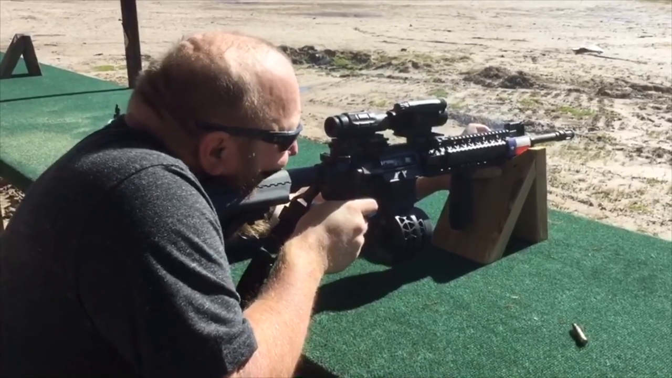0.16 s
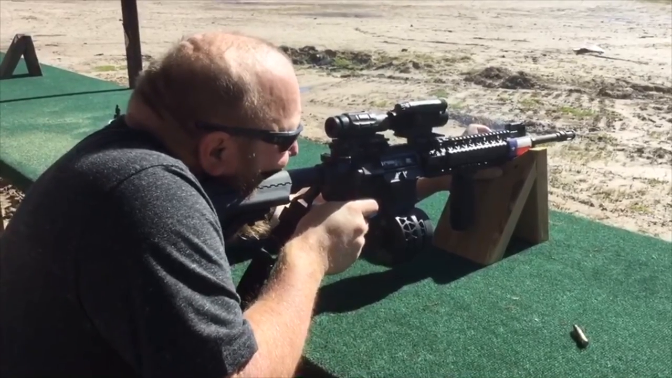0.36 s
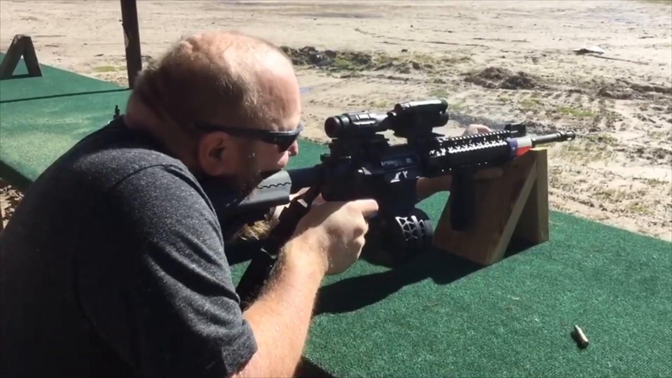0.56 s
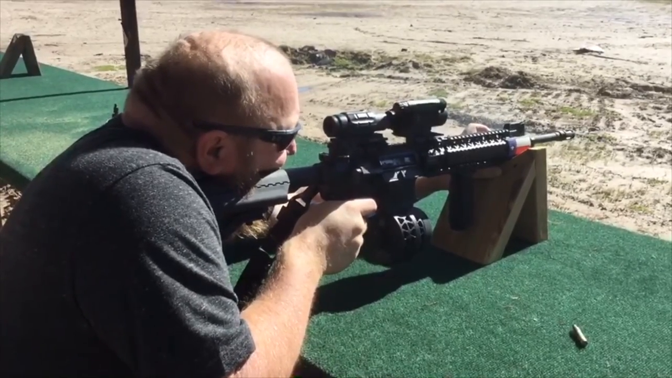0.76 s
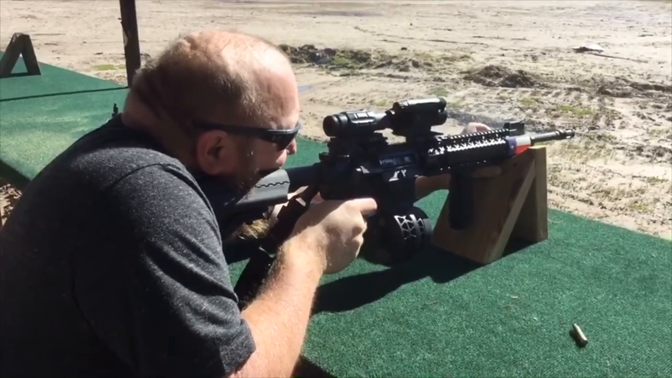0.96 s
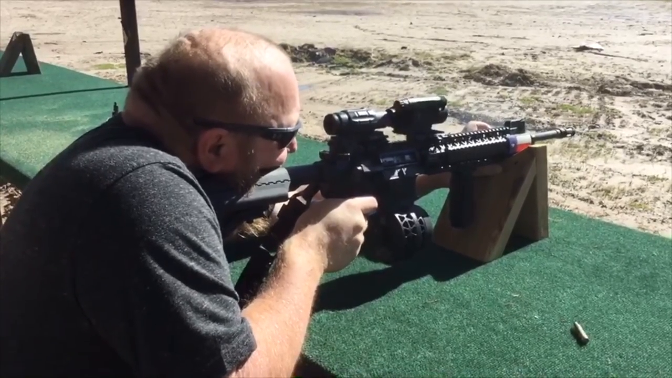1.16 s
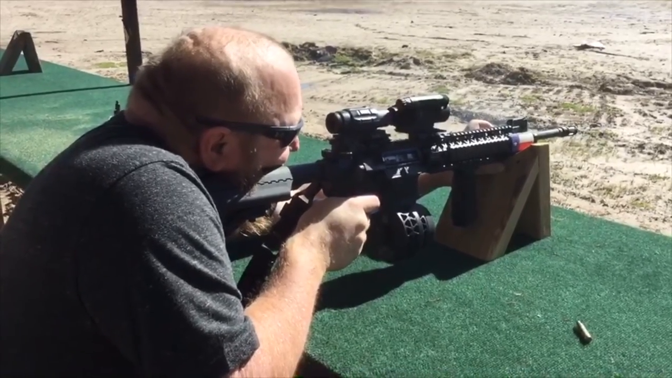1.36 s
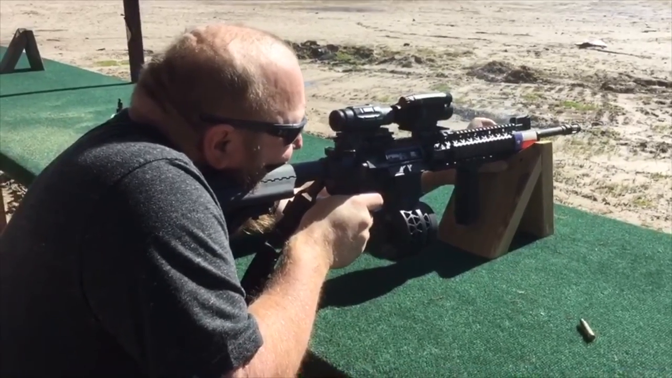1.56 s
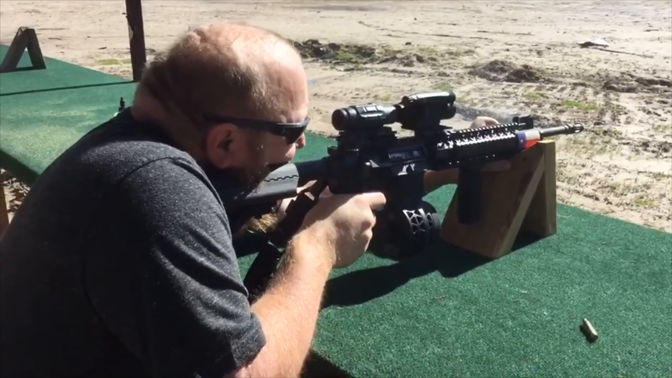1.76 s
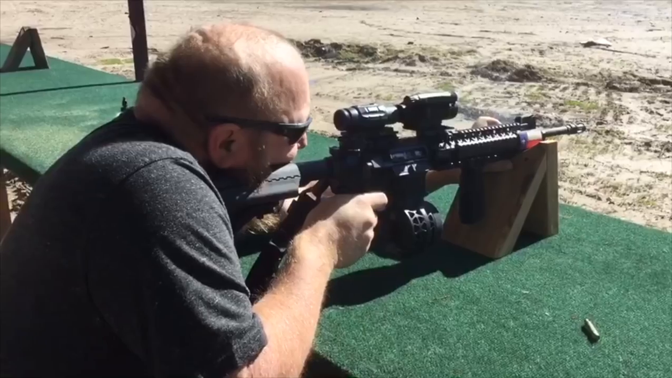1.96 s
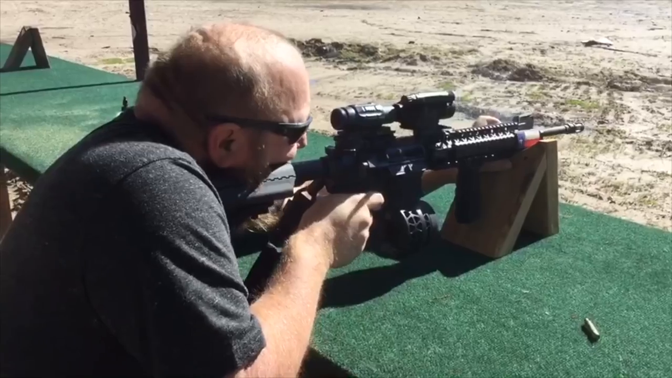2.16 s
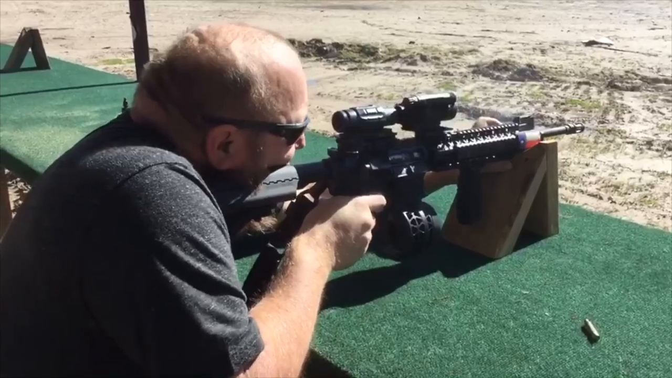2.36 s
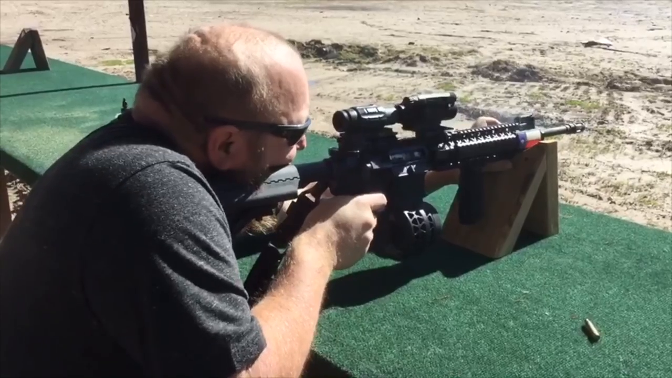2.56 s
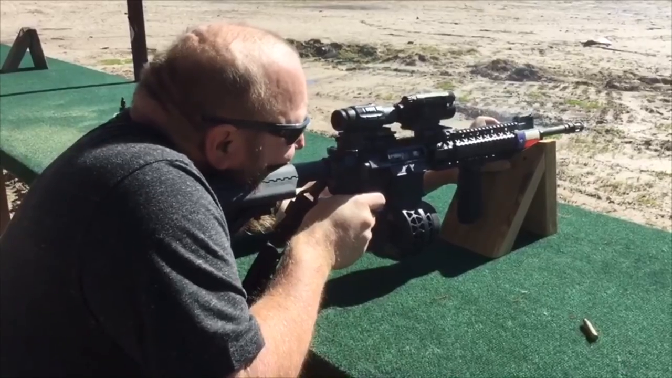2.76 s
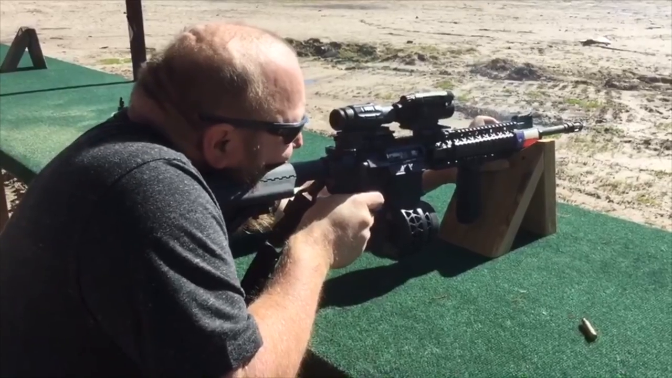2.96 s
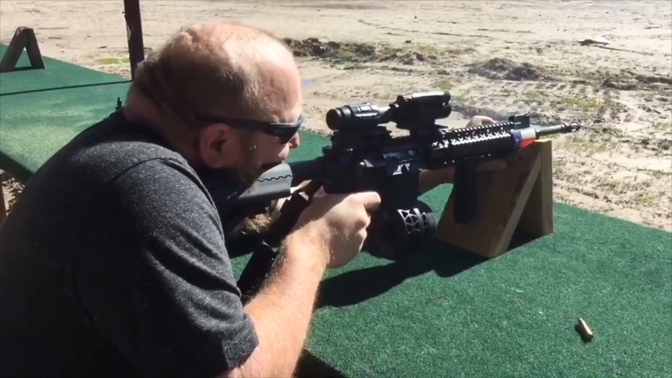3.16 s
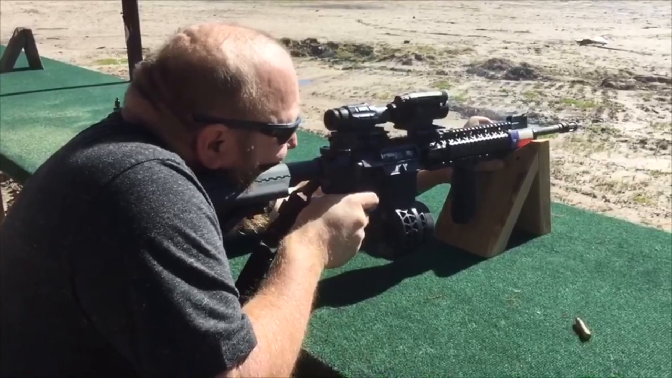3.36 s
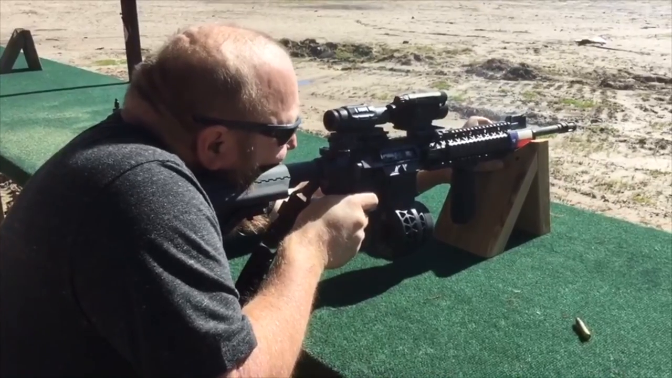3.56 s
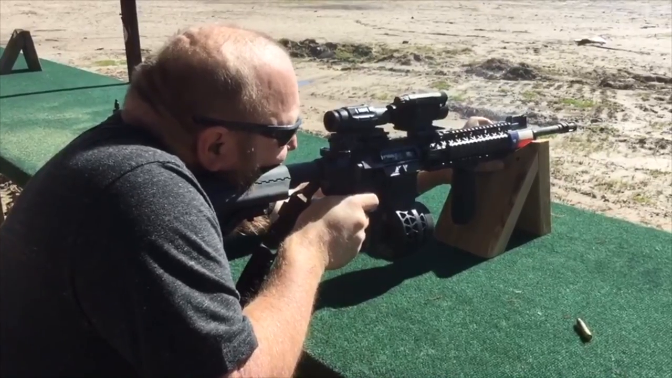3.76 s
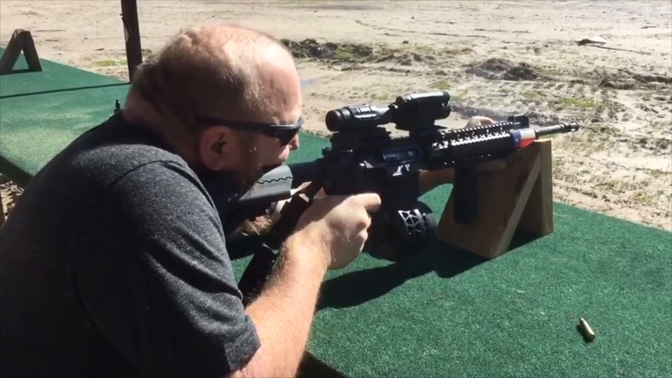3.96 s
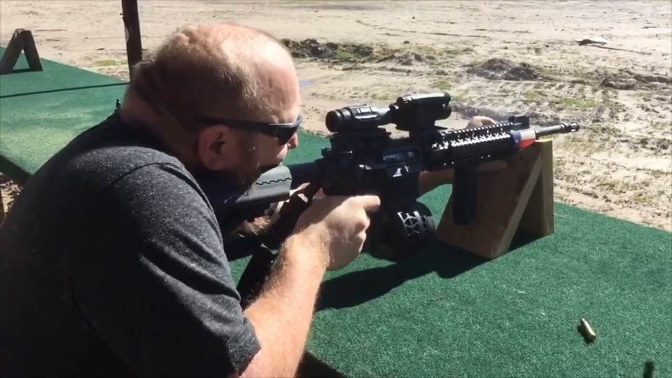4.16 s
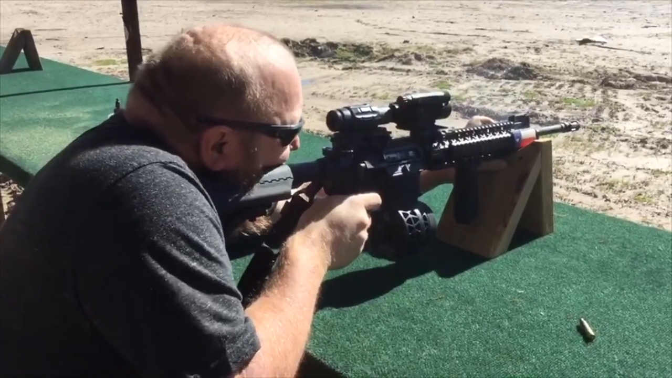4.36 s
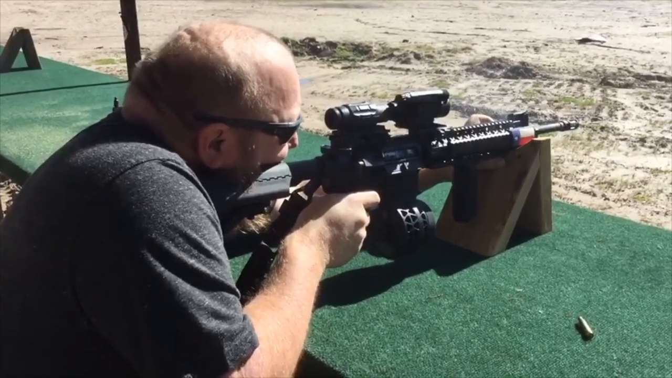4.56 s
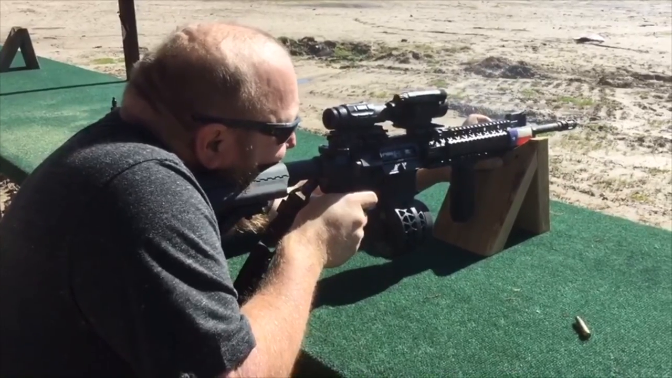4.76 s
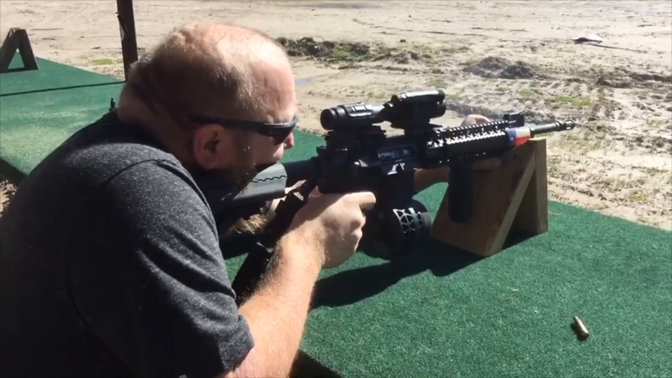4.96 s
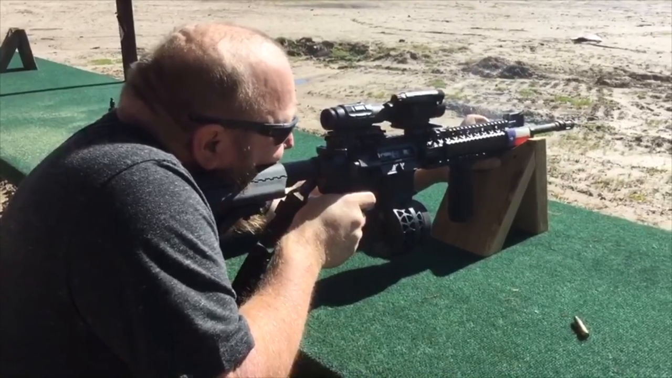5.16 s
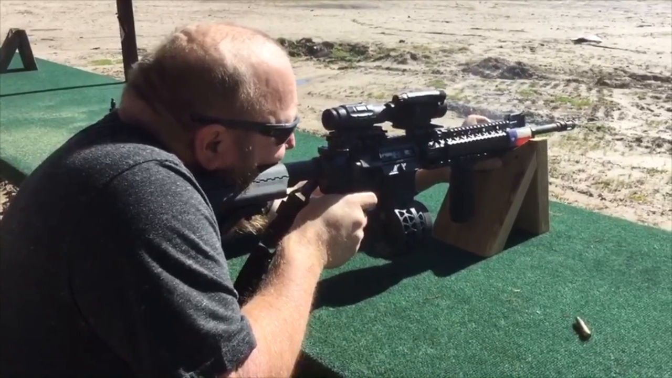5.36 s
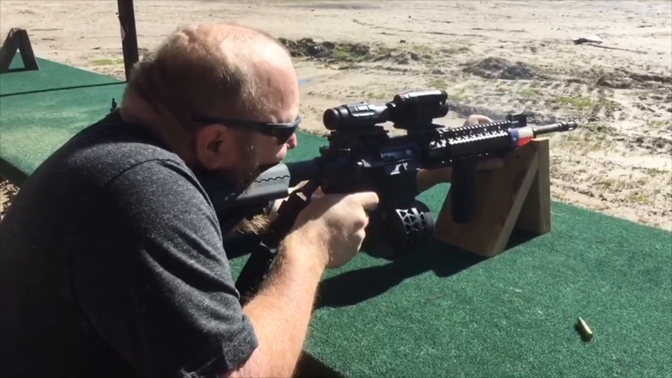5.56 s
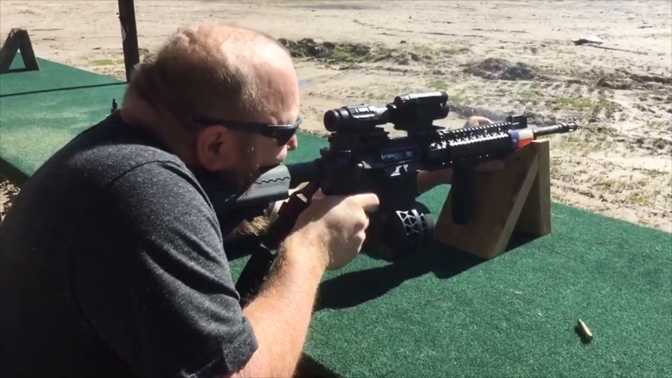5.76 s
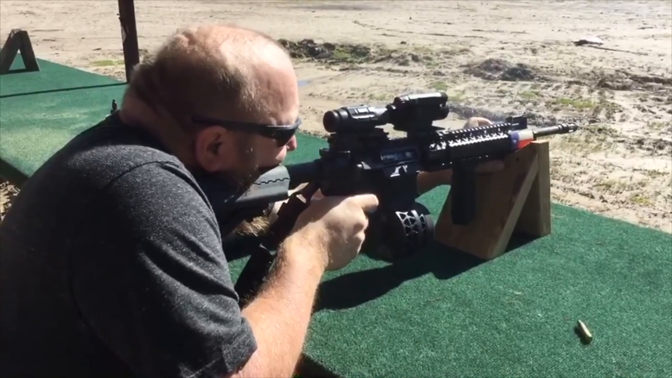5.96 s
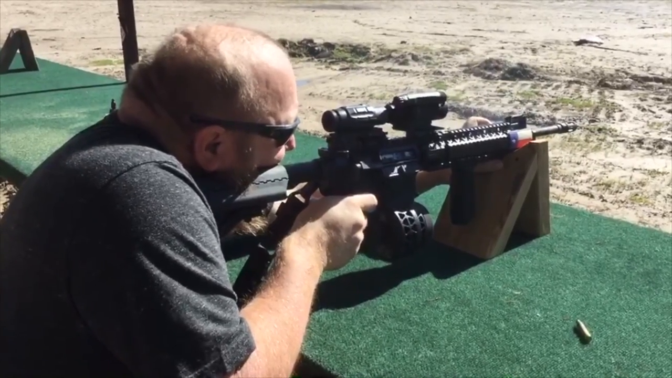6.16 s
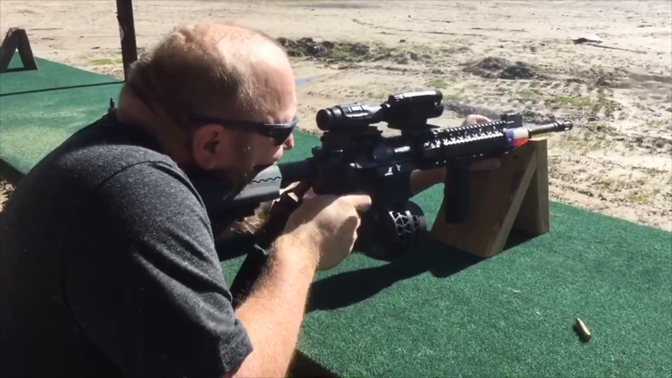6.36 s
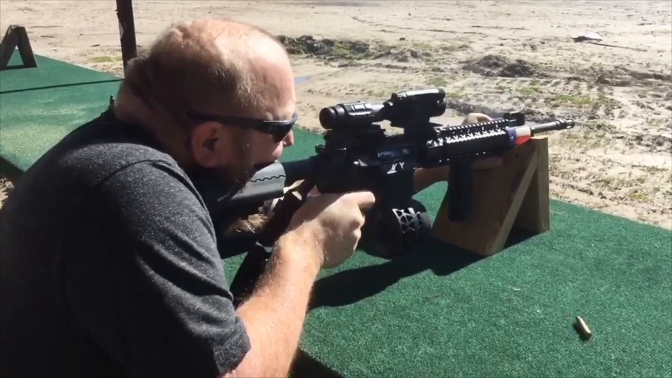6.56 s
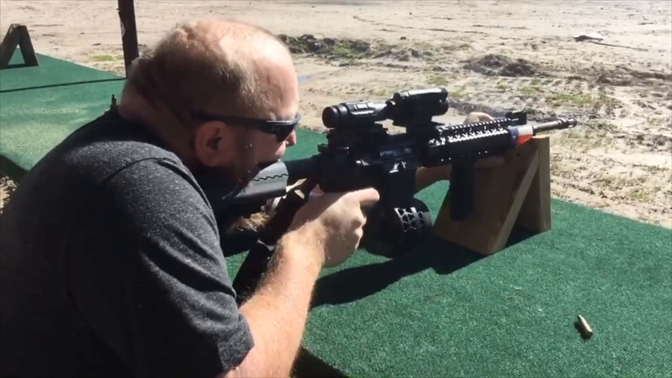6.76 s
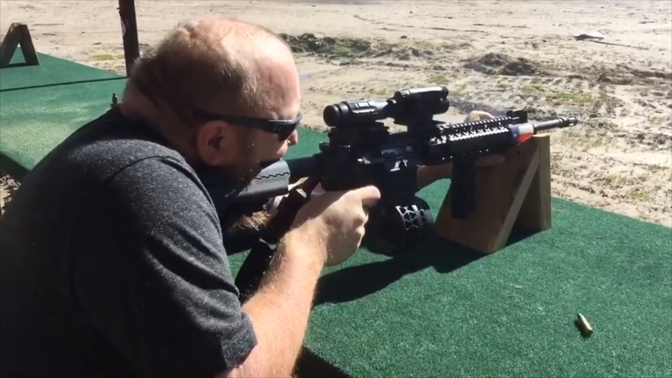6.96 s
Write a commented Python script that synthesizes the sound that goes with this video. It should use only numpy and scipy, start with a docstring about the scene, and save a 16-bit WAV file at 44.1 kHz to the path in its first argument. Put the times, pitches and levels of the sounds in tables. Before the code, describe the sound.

A rifle fires three loud, close shots about two seconds apart outdoors, each booming and echoing away, while a spent casing pings faintly.

```python
"""On an outdoor range, a rifle fires single shots from a covered firing point, near a small microphone.
Each blast cracks under the roof, excites the shelter's resonances and overloads the microphone,
then rolls back from berms and trees; of the first shot only this roll is heard. Spent brass ticks and
pings as it lands. Beneath lie a faint rumble and hiss, with a passing distant hum and whine."""
import sys
import numpy as np
from scipy import signal
from scipy.fft import irfft
from scipy.io import wavfile
from scipy.ndimage import uniform_filter1d

SR = 44100
rng = np.random.default_rng(int(sys.argv[2]) if len(sys.argv) > 2 else 0)


def bounce(signal):
    """Save signal as a 16-bit WAV file at the path given by the first command-line argument."""
    frames = np.transpose(np.atleast_2d(signal))
    limited = np.clip(frames, -1, 1)
    pcm = np.round(limited * 32767).astype(np.int16)
    wavfile.write(sys.argv[1], SR, pcm)


N = 313110


def gain_of(db):
    """Converts decibels to an amplitude ratio."""
    return 10 ** (np.asarray(db) / 20)


def unit_rms(x):
    """Normalises a signal to an rms of one."""
    return x / np.sqrt(np.mean(x ** 2) + 1e-20)


def curve_at(points, hz):
    """Interpolates a curve linearly over log frequency."""
    knots_hz, values = np.transpose(points)
    return np.interp(np.log(hz + 1), np.log(knots_hz + 1), values)


def add(mix, start_s, sound):
    """Superposes a sound on the mix; start_s may be negative."""
    at = round(start_s * SR)
    sound = sound[max(-at, 0):]
    part = mix[max(at, 0):][:len(sound)]
    part += sound[:len(part)]


def noise(spectrum, n, resonances=()):
    """Random-phase noise of a given spectrum, with resonance peaks added in power."""
    hz = np.fft.rfftfreq(n, 1 / SR)
    power = gain_of(curve_at(spectrum, hz)) ** 2
    for pitch_hz, width_hz, level_db in resonances:
        power += gain_of(level_db) ** 2 / (1 + ((hz - pitch_hz) / width_hz) ** 2) ** 2
    phases = np.exp(2j * np.pi * rng.random(len(hz)))
    return unit_rms(irfft(np.sqrt(power) * phases, n))


def damped(x, damping):
    """Frequency-dependent damping: each band decays exponentially at its own rate."""
    hz, t, spectra = signal.stft(x, SR, nperseg=256)
    loss_db = curve_at(damping, hz)[:, None] * t
    return signal.istft(spectra * gain_of(-loss_db), SR, nperseg=256)[1][:len(x)]


def steadied(x, span_s):
    """Division by the running rms levels out swells slower than span_s."""
    return x / np.sqrt(uniform_filter1d(x ** 2, int(span_s * SR)) + 1e-9)


def band(x, low_hz, high_hz):
    """A gentle band-pass filter."""
    return signal.sosfilt(signal.butter(2, [low_hz, high_hz], "band", fs=SR, output="sos"), x)


def burst(t, low_hz, high_hz, decay_s):
    """Band-limited noise with an exponential decay."""
    return unit_rms(band(rng.standard_normal(len(t)), low_hz, high_hz)) * np.exp(-t / decay_s)


def blast_wave(t, length_s):
    """A shock front: overpressure lasting length_s, then a longer rarefaction."""
    return (1 - t / length_s) * np.exp(-t / length_s)


def swell(t, peak_s, hold_s, rise_db_per_s, fade_db_per_s):
    """An envelope that grows exponentially to one at peak_s, holds and decays."""
    before_s, after_s = np.maximum(peak_s - t, 0), np.maximum(t - peak_s - hold_s, 0)
    return gain_of(-rise_db_per_s * before_s - fade_db_per_s * after_s)


def wander(rate_hz, t):
    """Slow random modulation of rms one, from sinusoids in the decade below rate_hz."""
    knots = np.linspace(t[0], t[-1], 600)
    rates_hz = np.geomspace(rate_hz / 10, rate_hz, 20)
    drift = sum(np.sin(2 * np.pi * (hz * knots + rng.random())) / np.sqrt(hz) for hz in rates_hz)
    return np.interp(t, knots, unit_rms(drift))


def rumble(t, level_db=-46.5, lumps_db=1.6, lumps_hz=9):
    """Low outdoor noise, made lumpy by amplitude modulation."""
    # rumble spectrum: frequency_hz, density_db
    spectrum = [(20, -28), (45, -12), (70, 0), (110, -3), (150, -2.5), (250, -10.5), (420, -25.5),
                (1000, -44), (16000, -100)]
    return gain_of(level_db) * unit_rms(noise(spectrum, len(t)) * gain_of(lumps_db * wander(lumps_hz, t)))


def hiss(level_db=-53.2, patchy_db=1.4, swell_db=2.1, swell_hz=2.5, drift_share=.005, drift_hz=1.5):
    """Noise through a time-varying filter: faint resonances swell and drift, and the level dips twice."""
    # hiss spectrum: frequency_hz, density_db
    spectrum = [(200, -3), (480, -3), (620, 2), (1200, 1), (2000, -7), (3000, -9.5), (4200, -11.7),
                (6500, -17.3), (9000, -19), (12500, -27.5), (15000, -44)]
    # resonances in the hiss: pitch_hz, width_hz, level_db
    resonances = [(1865, 45, -15), (2590, 75, -13), (2830, 70, -16), (3200, 60, -22), (3790, 120, -16),
                  (4070, 45, -24), (4550, 170, -18), (5700, 500, -23), (8700, 330, -21)]
    hz, t, spectra = signal.stft(rng.standard_normal(N), SR, nperseg=2048)
    patches = uniform_filter1d(rng.standard_normal(spectra.shape), size=7, axis=0)
    patches = unit_rms(uniform_filter1d(patches, size=12, axis=1))
    power = unit_rms(gain_of(curve_at(spectrum, hz)[:, None] + patchy_db * patches)) ** 2
    for pitch_hz, width_hz, ring_db in resonances:
        centre_hz = pitch_hz * (1 + drift_share * wander(drift_hz, t))
        strength = gain_of(swell_db * wander(swell_hz, t))
        ring = unit_rms(strength / (1 + ((hz[:, None] - centre_hz) / width_hz) ** 2))
        power += (gain_of(ring_db) * ring) ** 2
    dip_db = 3.9 * swell(t, peak_s=1.45, hold_s=.42, rise_db_per_s=300, fade_db_per_s=28)
    dip_db += 2.2 * swell(t, peak_s=6.06, hold_s=.15, rise_db_per_s=300, fade_db_per_s=28)
    return signal.istft(spectra * np.sqrt(power) * gain_of(level_db - dip_db), SR, nperseg=2048)[1][:N]


def hum(t, pitch_hz=236.9, level_db=-48):
    """A distant pure tone sets in once, holds and decays exponentially."""
    envelope = swell(t, peak_s=1.55, hold_s=.7, rise_db_per_s=70, fade_db_per_s=20)
    return gain_of(level_db) * envelope * np.sqrt(2) * np.sin(2 * np.pi * pitch_hz * t)


def whine(t, pitch_hz=1860, waver_share=.005, waver_hz=14, flutter_db=3):
    """A thin, distant tone comes and goes, wavering by frequency and amplitude modulation."""
    # swells of the whine: peak_s, level_db, hold_s
    swells = [(1.0, -71, .3), (3.93, -64.5, .2), (5.48, -67, .55)]
    envelope = sum(gain_of(level_db) * swell(t, peak_s, hold_s, rise_db_per_s=90, fade_db_per_s=50)
                   for peak_s, level_db, hold_s in swells)
    cycles = np.cumsum(pitch_hz * (1 + waver_share * wander(waver_hz, t))) / SR
    flutter = gain_of(flutter_db * wander(waver_hz, t))
    return envelope * unit_rms(np.sin(2 * np.pi * cycles) * flutter)


def spent_cases():
    """Impact excitation: a case ticks on landing, and on something hard its close modes ring and beat."""
    # landings and bounces: start_s, tick_db, ring_db
    impacts = [(2.5022, -51, -74), (4.3899, -48, -74), (5.024, -52, -47), (5.0274, -47, -43),
               (6.7446, -43, -72)]
    # modes of a brass case: pitch_hz, level_db, t60_s
    modes = [(10730, -6, .25), (10800, -16, .15), (11600, -14, .05), (14600, -7, .04), (14870, 0, .17),
             (14960, -11, .14), (15180, -6, .17)]
    t, out = np.arange(SR // 3) / SR, np.zeros(N)
    ring = sum(gain_of(db - 60 * t / t60_s) * np.sin(2 * np.pi * hz * t) for hz, db, t60_s in modes)
    for start_s, tick_db, ring_db in impacts:
        tick = burst(t, 6500, 14500, decay_s=.004)
        add(out, start_s, gain_of(tick_db) * tick + gain_of(ring_db) * ring)
    return out


def echo(thud_db, clap_db):
    """One reflection: the blast wave filtered to a thud, with a sharp clap of scattered sound."""
    t = np.arange(SR // 16) / SR
    thud = band(blast_wave(t, length_s=.0011), 130, 400)
    clap = burst(t, 360, 1300, decay_s=.007)
    return gain_of(clap_db) * clap + gain_of(thud_db) * thud / abs(thud).max()


def backscatter_gain(t, near_db=-25.3, far_db=-21.15, sag_db_per_s2=1.4):
    """Near and far trees add in power; the decay steepens as the scatter comes from farther off."""
    near = swell(t, peak_s=.15, hold_s=.06, rise_db_per_s=200, fade_db_per_s=130)
    far_peak_s = .29
    far = swell(t, far_peak_s, hold_s=.04, rise_db_per_s=200, fade_db_per_s=14.7)
    sag_db = sag_db_per_s2 * (t - far_peak_s) ** 2
    return np.hypot(gain_of(near_db) * near, gain_of(far_db - sag_db) * far)


def roll(late_count=12, late_from_s=.82, late_span_s=.95):
    """Outdoor reverberation: dense scattering from trees and discrete echoes, dulled by air absorption."""
    # spectrum scattered by the trees: frequency_hz, density_db
    spectrum = [(25, -36), (60, -18), (100, -9.5), (160, 1.5), (260, 2.4), (385, -4.8), (465, -13),
                (600, -11), (850, -17.5), (1300, -16), (2600, -22), (4000, -28), (8000, -32.5),
                (15000, -40)]
    # reflections from berms and tree lines: delay_s, thud_db, clap_db
    reflections = [(0.163, -21, -21), (0.2065, -24, -25), (0.219, -22, -23), (0.279, -14, -24.5),
                   (0.3071, -13, -25), (0.3195, -11.5, -31), (0.3524, -13, -32), (0.3641, -14, -32),
                   (0.4227, -14, -36), (0.4455, -10, -34), (0.532, -24, -18.5), (0.5343, -8.5, -23),
                   (0.5498, -15, -29), (0.5743, -12, -33), (0.6384, -18, -35), (0.6485, -17, -37),
                   (0.7514, -17, -40), (0.8014, -22, -43), (1.101, -30, -34), (1.1906, -25, -45),
                   (1.2393, -34, -39), (1.274, -27, -49), (1.318, -23, -42)]
    t = np.arange(3 * SR) / SR
    out = steadied(noise(spectrum, len(t)), span_s=.05) * backscatter_gain(t)
    # lesser echoes fall at random late in the roll
    late_s = late_from_s + late_span_s * (np.arange(late_count) + rng.random(late_count)) / late_count
    for delay_s in late_s:
        add(out, delay_s, backscatter_gain(delay_s) * echo(thud_db=6, clap_db=-15))
    for delay_s, thud_db, clap_db in reflections:
        add(out, delay_s, echo(thud_db, clap_db))
    # air takes 1.5 dB per second at 1 kHz and far more of the treble
    absorption = [(hz, 1.5 * (hz / 1000) ** 1.45) for hz in np.geomspace(100, 16000, 12)]
    return damped(out, absorption)


def shelter_boom():
    """Shelter resonance: the boom starts subdued, swells at about 70-90 ms, then surges more weakly."""
    # broad body of the boom: frequency_hz, density_db
    spectrum = [(20, -23), (45, -18), (70, -14), (130, -11.5), (300, -7), (700, -12.5), (1500, -22),
                (4000, -38), (16000, -70)]
    # resonances of the shelter: pitch_hz, width_hz, level_db
    resonances = [(564, 75, 0), (768, 35, -6), (1033, 18, -8), (1132, 14, -6), (1343, 14, -4.5),
                  (1412, 16, -7.5)]
    # surges of the boom after the shot: peak_s, body_db, ring_db, hold_s
    surges = [(0, -24, -24, .035), (.066, -19, -6, .018), (.087, -9, -14, .012), (.111, -18, -22, .005),
              (.137, -16, -23, .012), (.18, -25, -31, .04)]
    t = np.arange(SR // 2) / SR
    envelopes = np.array([swell(t, peak_s, hold_s, rise_db_per_s=650, fade_db_per_s=480)
                          for peak_s, _, _, hold_s in surges])
    body_db, ring_db = np.transpose(surges)[1:3, :, None]
    body = steadied(noise(spectrum, len(t)), span_s=.025)
    ring = band(noise(spectrum, len(t), resonances), 380, 1700)
    ring = steadied(unit_rms(ring), span_s=.025)
    # the surges add in power
    body_gain = np.linalg.norm(gain_of(body_db) * envelopes, axis=0)
    ring_gain = np.linalg.norm(gain_of(ring_db) * envelopes, axis=0)
    return body * body_gain + ring * ring_gain


def pressure_slaps():
    """Direct sound and early reflections: the blast wave reaches the bench, then returns off near walls."""
    # arrivals at the bench: delay_s, wave_db, length_s, splash_db
    arrivals = [(.001, -4, .001, -20), (.0835, -7, .002, -26), (.1115, -8, .0009, -26),
                (.1355, -9, .0008, -18), (.139, -5.5, .0015, -25), (.1505, -5, .0013, -32)]
    t = np.arange(SR // 2) / SR
    out = np.zeros(len(t))
    for delay_s, wave_db, length_s, splash_db in arrivals:
        splash = gain_of(splash_db) * burst(t, 400, 3500, decay_s=.006)
        wave = 2 * gain_of(wave_db) * band(blast_wave(t, length_s), 90, 1200)
        add(out, delay_s, wave + splash)
    return out


def muzzle_crack(level_db=-4, ragged_db=3.4, ragged_s=.0025):
    """Multiple reflection: the bright blast builds raggedly between bench and roof, then dies quickly."""
    # spectrum of the crack: frequency_hz, density_db
    spectrum = [(30, -24), (100, -9), (200, -3), (500, -4), (1000, -3), (2200, -1), (3500, -3.1),
                (7000, -8.5), (10000, -7.5), (15000, -13)]
    # extra damping of the treble: frequency_hz, loss_db_per_s
    damping = [(500, 0), (2000, 12), (4000, 46), (8000, 85), (15000, 135)]
    # steel posts and fittings ringing in sympathy: pitch_hz, width_hz, level_db
    steel_modes = [(1511, 10, 0), (1928, 10, 4), (2180, 22, 1), (2249, 10, 3), (3380, 12, 3.5),
                   (3784, 12, 2), (4077, 16, 1)]
    t = np.arange(SR // 2) / SR
    envelope = swell(t, peak_s=.052, hold_s=0, rise_db_per_s=135, fade_db_per_s=180)
    # reflections bunch and thin out at random
    bunching = unit_rms(uniform_filter1d(rng.standard_normal(len(t)), int(ragged_s * SR)))
    rattle = unit_rms(gain_of(ragged_db * np.tanh(bunching)))
    return gain_of(level_db) * envelope * rattle * damped(noise(spectrum, len(t), steel_modes), damping)


def scene(fresh_share=.35):
    """Superposition at one microphone, fed to both channels; all shots share the same reflection paths."""
    # rifle shots, the first already rolling away: start_s, blast_db, roll_db
    shots = [(-0.8387, 0, -1.5), (2.2783, 0, 0), (4.1108, 0, 0), (6.4758, 0, 0)]
    t = np.arange(N) / SR
    mix = rumble(t) + hiss() + hum(t) + whine(t) + spent_cases()
    shared_boom, slaps, far_roll = shelter_boom(), pressure_slaps(), roll()
    for start_s, blast_db, roll_db in shots:
        crack = muzzle_crack()
        # fresh_share of the boom's power is new with each shot
        boom = np.sqrt(1 - fresh_share) * shared_boom + np.sqrt(fresh_share) * shelter_boom()
        add(mix, start_s, gain_of(blast_db) * (crack + slaps + boom))
        add(mix, start_s, gain_of(roll_db) * far_roll)
    return np.array([mix, mix])


def record(dry, ceiling=.57, low_cut_hz=30, high_cut_hz=15950):
    """Saturation: the overloaded microphone flattens each blast's peaks, then limits the bandwidth."""
    oversampled = signal.resample_poly(dry, 2, 1, axis=1)
    saturated = oversampled / (1 + (oversampled / ceiling) ** 4) ** (1 / 4)
    # the steep filter after the overload rings, so the flat tops overshoot unevenly
    ringing = signal.sosfilt(signal.butter(8, high_cut_hz, fs=2 * SR, output="sos"), saturated)
    clipped = signal.resample_poly(ringing, 1, 2, axis=1)
    high_passed = signal.lfilter(*signal.butter(1, low_cut_hz, "high", fs=SR), clipped)
    band_limit = signal.firwin(511, high_cut_hz, window=("kaiser", 9), fs=SR)
    return signal.oaconvolve(high_passed, band_limit[None], "same", axes=1)


dry = scene()
out = record(dry)
bounce(out)
```